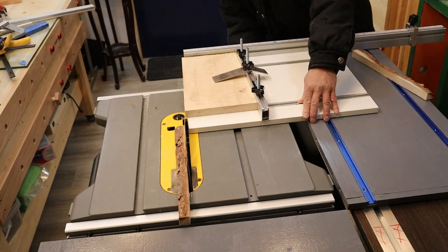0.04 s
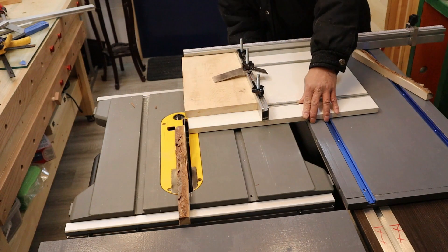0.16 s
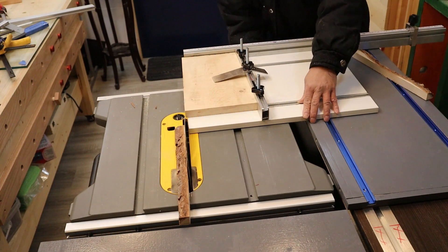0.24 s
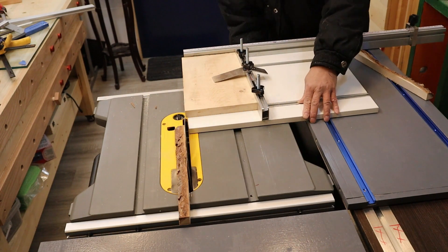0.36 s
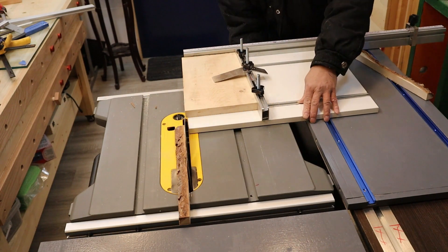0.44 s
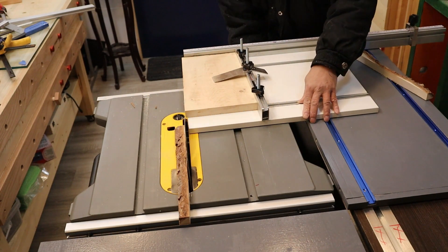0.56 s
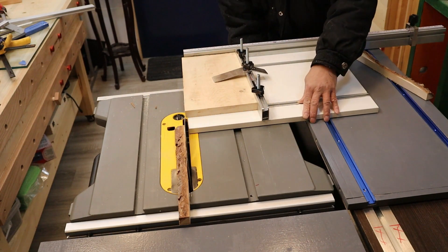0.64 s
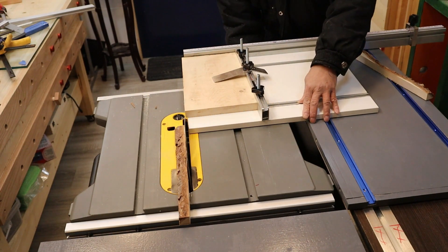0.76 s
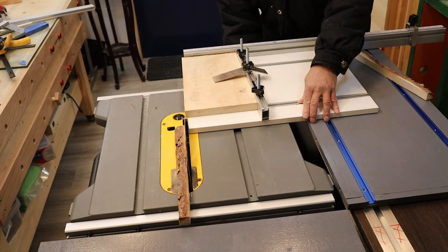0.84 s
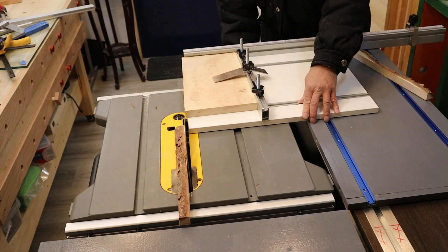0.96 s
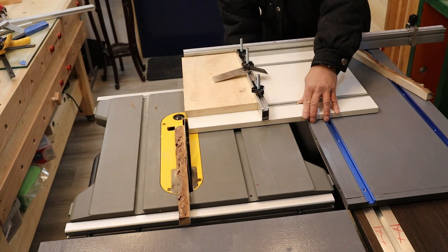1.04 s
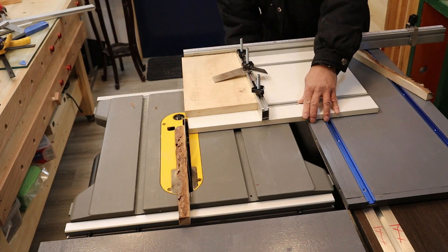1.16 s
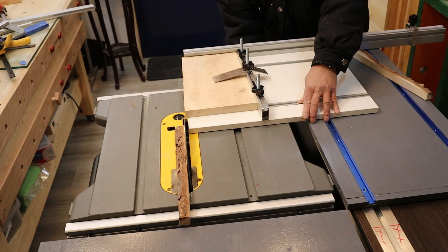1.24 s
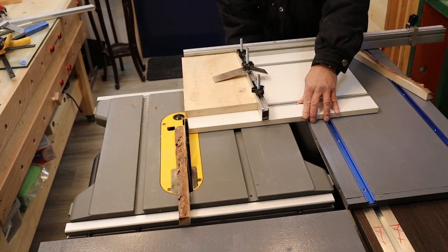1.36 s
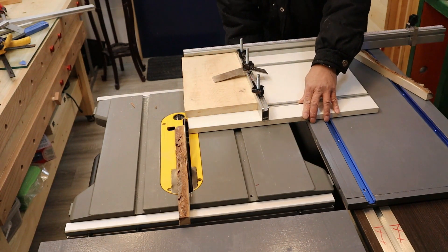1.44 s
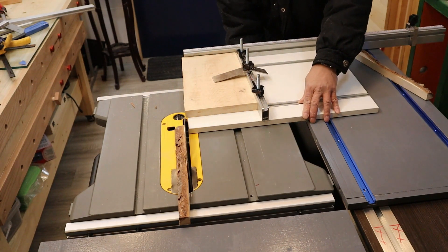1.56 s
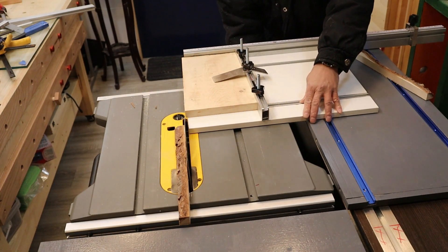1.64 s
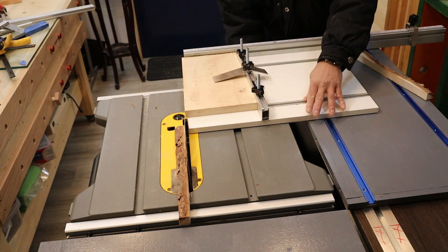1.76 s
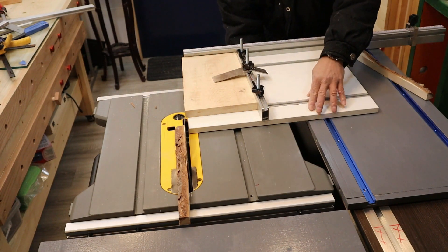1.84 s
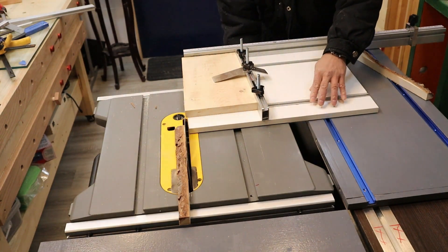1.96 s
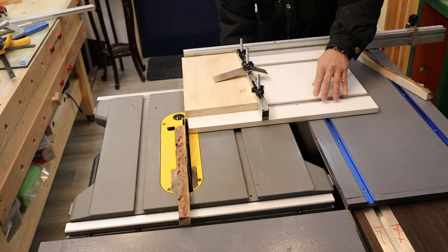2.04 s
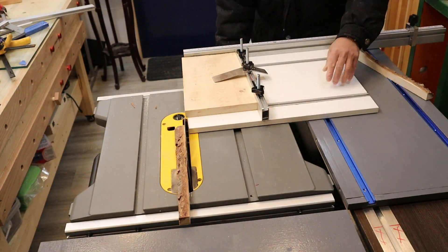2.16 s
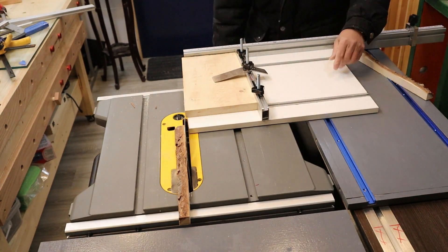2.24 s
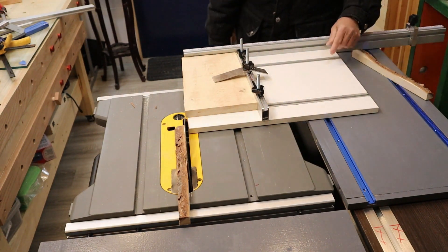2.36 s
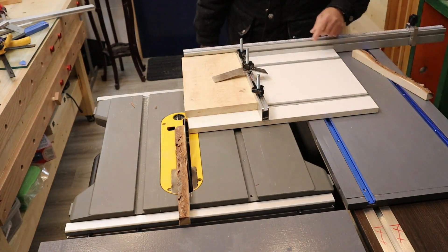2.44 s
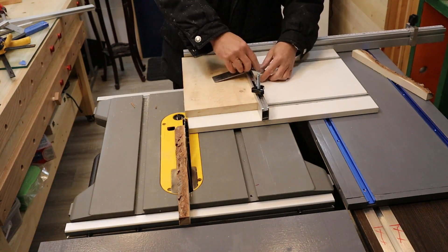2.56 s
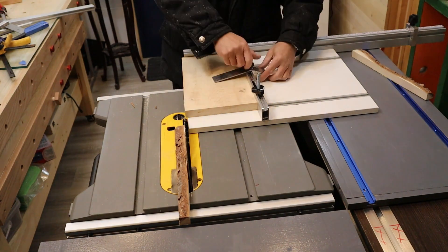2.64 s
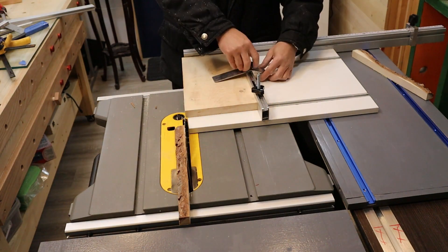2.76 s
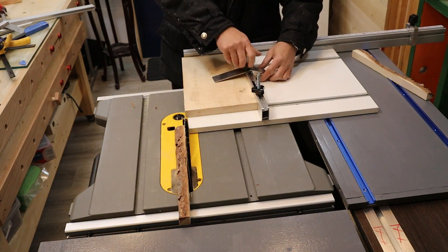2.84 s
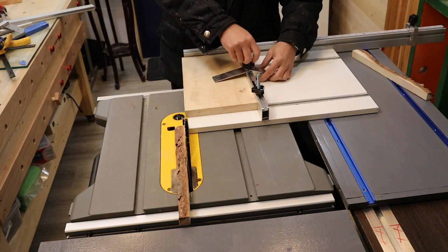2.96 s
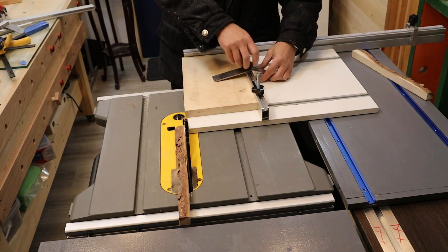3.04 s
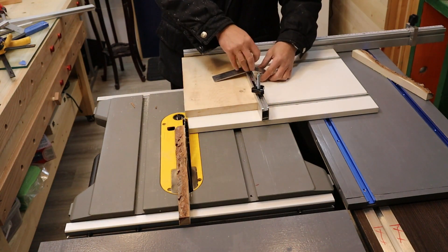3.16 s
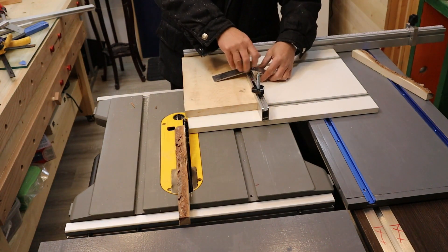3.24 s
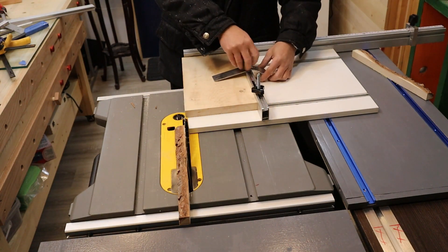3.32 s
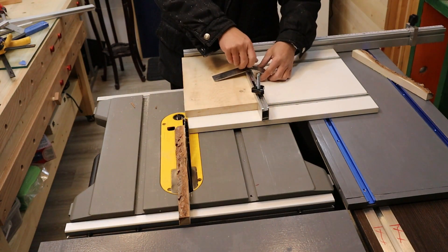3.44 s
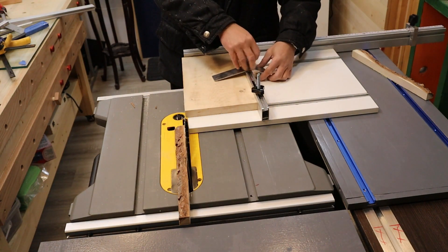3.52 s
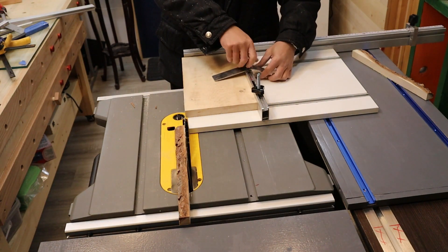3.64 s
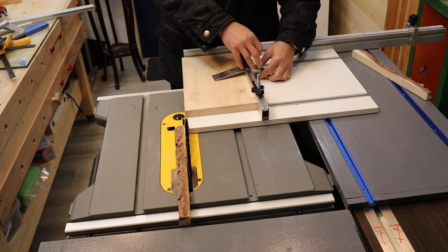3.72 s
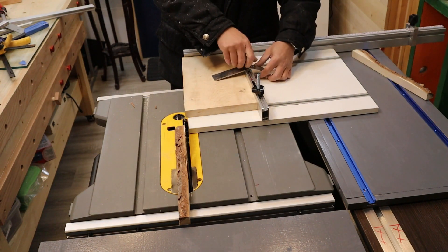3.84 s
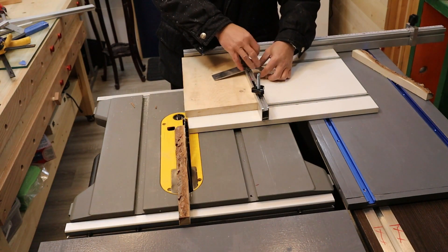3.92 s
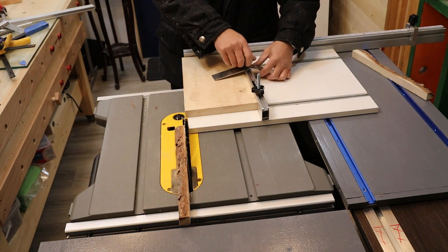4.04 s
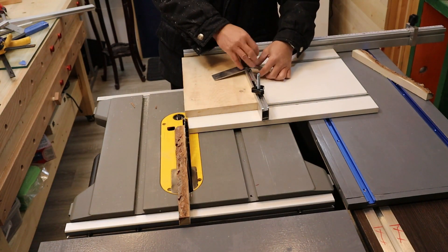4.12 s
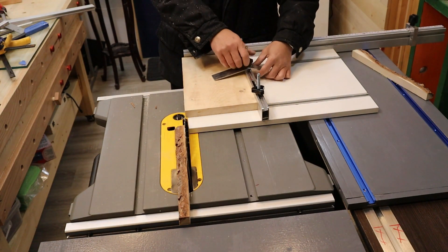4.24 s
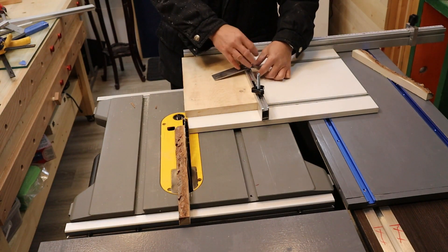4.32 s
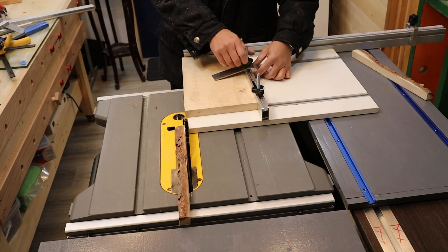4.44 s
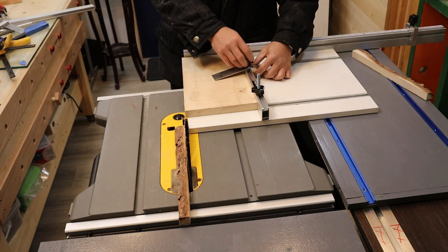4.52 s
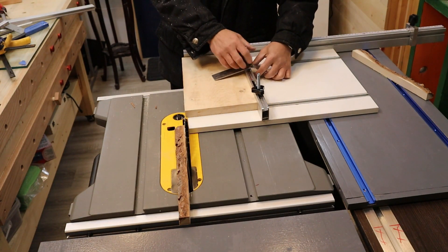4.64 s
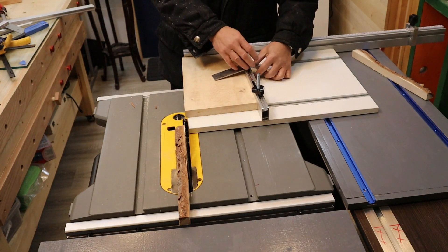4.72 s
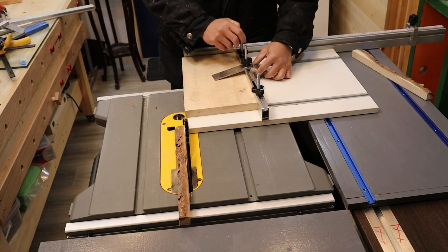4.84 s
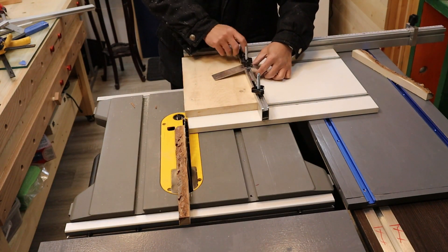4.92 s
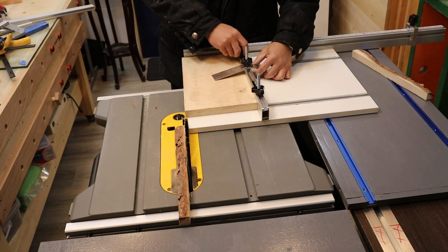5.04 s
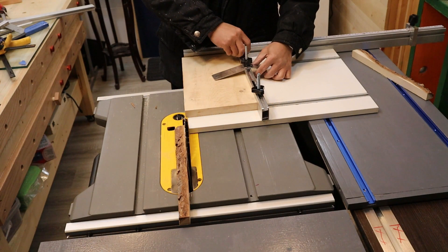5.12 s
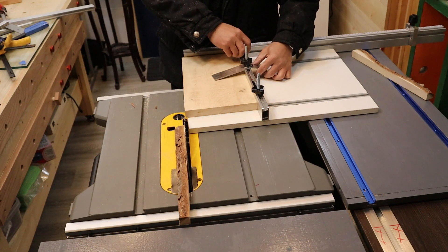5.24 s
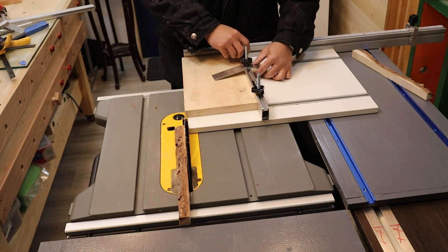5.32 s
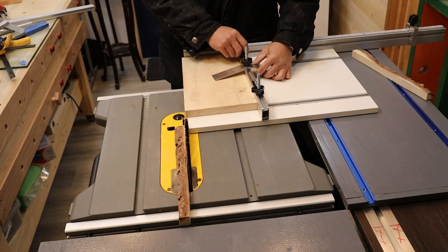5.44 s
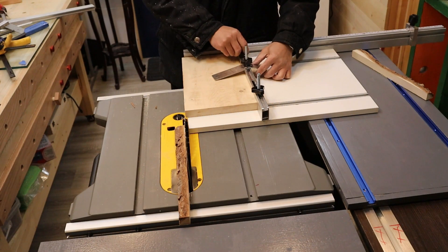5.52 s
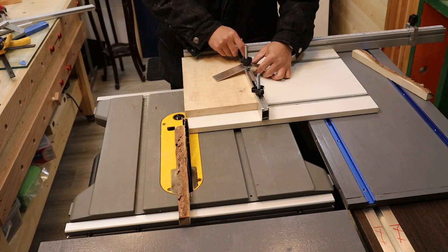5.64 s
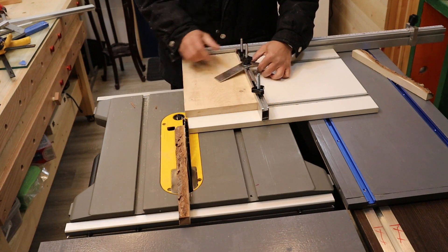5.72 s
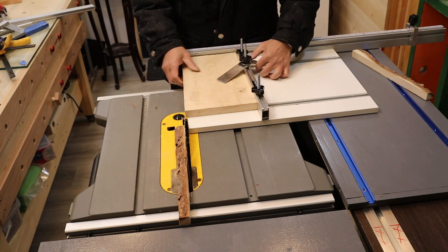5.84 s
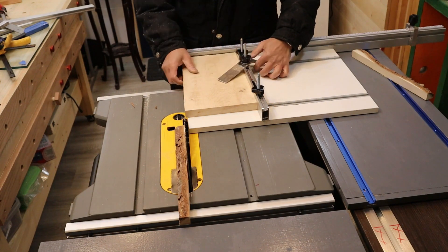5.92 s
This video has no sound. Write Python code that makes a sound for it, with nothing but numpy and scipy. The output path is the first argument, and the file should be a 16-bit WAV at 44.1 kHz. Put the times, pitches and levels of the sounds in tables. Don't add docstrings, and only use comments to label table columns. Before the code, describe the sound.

From 0 to 2 s, a dust extractor roars with broad, booming air and a thin, very high whistle, over a saw's steady, piercing gear whine. At about 2.0 s both are switched off: the whistle dies at once, the whine glides steeply down in fraying steps, a low hum swells briefly and sags, and air hisses as it coasts out. At about 2.55 s the sound cuts abruptly to a quiet workshop with faint low rumble and a drone swelling briefly near 2.9 s. Hands work a clamp on a wooden sled: irregular metallic clicks, dull board knocks, bright knob ticks and rustling rubs. They are busy and strongest from 3 to 4.8 s, mostly faint and sparse around 5 s, with light knocks near 5.2, 5.5 and 5.7-5.9 s and a closing rub. Sped-up playback smears each blow into a short, grainy swell. Wide stereo, close pickup, short small-room reflections.

```python
import sys
import numpy as np
from scipy import signal
from scipy.fft import rfft, irfft, next_fast_len
from scipy.io import wavfile
from scipy.ndimage import uniform_filter1d

SR = 44100
rng = np.random.default_rng(int(sys.argv[2]) if len(sys.argv) > 2 else 0)


def inscribe(sig):
    pcm = np.round(np.clip(np.atleast_2d(sig).T, -1, 1) * 32767)
    wavfile.write(sys.argv[1], SR, pcm.astype(np.int16))


def volts_from_db(level):
    exponent = np.asarray(level, float) / 20
    return 10 ** exponent


N = 263718
T = np.arange(N) / SR
RUN = 2 * int(1.3 * SR)
WIDE = 2 * next_fast_len(N // 2 + 1)
OFF_S, CHANGE_S = 2.015, 2.558
ALIKE, ALIKE_HZ, DRIFT_RAD, LEAD_RAD = 0.97, 403, 1.2, 1.2
# [f/Hz, density/dB per Hz]
CRACK = [(88, -79), (150, -41), (262, 18.5), (833, -15.5), (1640, -11.5), (1980, -17.5), (2140, -12),
         (6810, -16.5), (8750, -14), (10400, -10.5), (15000, -47)]


def level(x, db):
    return x * volts_from_db(db) / np.sqrt(np.mean(x ** 2))


def curves(table):
    s, *columns = np.transpose(table)
    return [np.interp(T, s, c) for c in columns]


def colour(points, size):
    hz, db = np.transpose(points)
    return volts_from_db(np.interp(np.log(np.fft.rfftfreq(size, 1 / SR) + 1), np.log(hz), db))


def peaks(table, size):
    f = np.fft.rfftfreq(size, 1 / SR)
    power = sum(volts_from_db(2 * db) / (1 + (2 * (f - hz) / width) ** 2) for hz, width, db in table)
    return np.sqrt(power)


def hiss(gain, count=N):
    size = 2 * (len(gain) - 1)
    noise = rfft(rng.standard_normal((2, size)))
    return level(irfft(noise * gain)[:, :count], 0)


def walk(rate, smooth=1.0, count=N):
    k = int(SR / rate)
    held = np.repeat(rng.standard_normal((2, N // k + 1)), k, axis=1)[:, :count]
    return 1.18 * uniform_filter1d(held, max(int(smooth * k), 1), axis=1)


def tone(hz, slip, flutter_db, count=N, lead=0):
    turn = 2 * np.pi * np.cumsum(hz + 0 * T[:count]) / SR + lead * np.array([[1], [0]])
    slips = slip * walk(2.2, 0.066, count=count)
    jitter = 0.22 * walk(60, count=count)
    return np.sqrt(2) * volts_from_db(flutter_db * walk(45, count=count)) * np.sin(turn + slips + jitter)


def room(x, t60=0.16, wet_db=-10):
    t = np.arange(SR // 2) / SR
    tail = rng.standard_normal((2, len(t))) * volts_from_db(-60 * t / t60) * (t > .006)
    wet = signal.fftconvolve(x, tail / np.linalg.norm(tail[0]), axes=1)[:, :x.shape[1]]
    return x + volts_from_db(wet_db) * wet


def extractor_whistle(since, shaft_hz):
    # [left/dB, right/dB, slip/rad]
    sidebands = [(-54, -67, 1.1), (-73, -56, 0.8), (-75, -64, 0.89), (-83, -57, 0.54), (-68, -68, 2),
                 (-50.5, -97, 2.55), (-45.5, -45.5, 0.14), (-74, -72, 1)]
    full_shaft_hz, blade_hz, t60_s = 266.9, 6651.9, 0.09
    whistle = 0
    for k, (left_db, right_db, slip) in enumerate(sidebands):
        line_hz = blade_hz + (k - 6) * full_shaft_hz
        fade = volts_from_db(np.array([[left_db], [right_db]]) - 60 * since / t60_s)
        whistle = whistle + fade * tone(line_hz, slip, 0.43, count=RUN)
    for from_hz, to_hz, slide_db in [(6610, 5600, -57.5), (3030, 2300, -63.5)]:
        slide_hz = to_hz + (from_hz - to_hz) * np.exp(-since / 0.11)
        sliding = tone(slide_hz, 3.0, 3.6, count=RUN) * (0.75 + 0.53 * walk(350, count=RUN))
        sliding = sliding * (.6 + 1.5 * np.cos(2 * np.pi * np.cumsum(shaft_hz) / SR))
        whistle = whistle + (since > 0) * volts_from_db(slide_db - 60 * since / 1.44) * sliding
    return whistle


def extractor_air(since):
    # [f/Hz, density/dB per Hz]
    running = [(15, -71), (25, -42.5), (196, -24.5), (264, -7.5), (309, -12), (1180, -8), (1310, -10),
               (3440, -7), (3930, -10), (4260, -10), (5570, -12.5), (6540, -15.5), (7090, -13),
               (10300, -14.5), (15000, -42.5)]
    # [f/Hz, density/dB per Hz]
    freewheeling = [(25, -53), (85, -14), (130, -24), (260, -11.5), (400, -18), (900, -11.5), (1600, -16),
                    (2300, -11.5), (3600, -16.5), (4600, -23), (5300, -11.5), (6000, -14.5), (7000, -15.5),
                    (9800, -26), (11500, -43), (15000, -66)]
    # [f/Hz, width/Hz, level/dB]
    housing = [(86, 10, 8), (355.6, 5.6, 7.5), (690, 75, 3), (800, 26, 1), (895, 28, 2), (1196, 25, 3.5),
               (2290, 125, -2.5), (2786, 27, -3), (3424, 130, -4.5)]
    roar_db, roar_lag_s, roar_t60_s = -44.5, 0.025, 0.49
    coast_db, coast_under_db, coast_lag_s, coast_t60_s = -55, -3, 0.16, 2.04
    run_db = roar_db - 60 * np.maximum(since - roar_lag_s, 0) / roar_t60_s
    coast_db = coast_db + coast_under_db * (since == 0)
    coast_db = coast_db - 60 * np.maximum(since - coast_lag_s, 0) / coast_t60_s
    air = hiss(colour(running, RUN), count=RUN)
    panels = hiss(colour(running, RUN) * peaks(housing, RUN), count=RUN)
    booming = volts_from_db(-7 + 3.0 * walk(14, count=RUN)) * panels
    driven = volts_from_db(run_db + 0.36 * walk(7, count=RUN)) * (air + booming)
    coasting = volts_from_db(coast_db + 1.8 * walk(12, count=RUN)) * hiss(colour(freewheeling, RUN), count=RUN)
    brake_colour = [(6000, -20), (7500, 1), (10300, 4), (11500, -17), (13000, -40)]
    brake = hiss(colour(brake_colour, RUN), count=RUN)
    brake_db = -49.5 - 60 * since / 1.05 + 2.5 * walk(30, count=RUN)
    return driven + coasting + np.clip(since / 0.026, 0, 1) * volts_from_db(brake_db) * brake


def extractor():
    # [t/s, f/Hz, level/dB]
    shaft = [
        (0, 268.6, -61.5),
        (2.04, 266, -67.5),
        (2.08, 255.4, -52),
        (2.13, 203.6, -58),
        (2.2, 190, -69),
        (2.26, 186.4, -87),
        (2.56, 181.2, -91),
    ]
    since = np.maximum(T[:RUN] - OFF_S, 0)
    hz, db = (c[:RUN] for c in curves(shaft))
    hum = volts_from_db(db) * tone(hz, 0.81, 2.5, count=RUN)
    return extractor_whistle(since, hz) + hum + extractor_air(since)


def saw():
    # [t/s, f/Hz, level/dB]
    gear = [(0, 4170, -54.5), (0.7, 4174.7, -56.5), (1.05, 4174.8, -54), (2.01, 4174.9, -54),
            (2.045, 3450, -55.5), (2.09, 2850, -56), (2.15, 2350, -59), (2.19, 2056, -57),
            (2.225, 1550, -67), (2.25, 1199, -66.5), (2.32, 1054, -64.5), (2.39, 771, -68.5),
            (2.48, 688, -69), (2.56, 553, -75)]
    # [left/dB, right/dB]
    orders = [(3.5, 0), (-9, -6), (-13, -12)]
    # [f/Hz, width/Hz, level/dB]
    frame = [(3450, 500, 2.5), (2200, 410, 10), (1090, 230, 5.5), (756, 120, 6.5)]
    hz, db = (c[:RUN] for c in curves(gear))
    slowing = T[:RUN] > OFF_S
    step = int(.045 * SR)
    stepped = np.roll(hz, -step // 2)[::step].repeat(step)[:RUN]
    hz = uniform_filter1d(stepped, step // 2) * slowing + hz * ~slowing
    lift = sum(lift_db / (1 + (2 * (hz - f) / width) ** 2) for f, width, lift_db in frame)
    db = db + slowing * (lift - 2.0)
    lead = 2.4 - 3.0 * (np.minimum(T[:RUN], OFF_S) - 1.25) ** 2
    mesh = 0
    for k, sides in zip((1, 2, 7 / 3), orders):
        gain = volts_from_db(np.array(sides)[:, None] - 15 * slowing * (k > 1))
        mesh = mesh + gain * tone(k * hz, 0.15, 1.9, count=RUN, lead=lead)
    fray = slowing * 1.7 * np.clip(hz / 2500, .45, 1) * walk(400, count=RUN)
    swell = volts_from_db(db - 2.5 + 2.1 * walk(25, count=RUN) * slowing)
    return room(swell * mesh * (1 + fray), 0.19, -6.5)


def rubbing():
    # [t/s, level/dB]
    grip = [(2.56, -74), (2.81, -80.5), (3.07, -72), (3.2, -62.5), (3.4, -66.5), (3.76, -62.5), (3.86, -75),
            (4.0, -60), (4.1, -76), (4.41, -64.5), (4.55, -70.5), (4.71, -68.5), (5.24, -73.5), (5.48, -80),
            (5.87, -72), (5.98, -59.5)]
    low_db = curves(grip)[0]
    steel_db = low_db.mean() - 18.5 + 1.6 * (low_db - low_db.mean())
    humming = peaks([(3100, 90, 4), (1070, 60, 0.0), (2150, 80, 0.0), (1710, 120, 0.0)], WIDE)
    wood_band = colour([(300, -26.0), (700, -0.5), (6000, -17.5), (7000, -36)], WIDE)
    wood = hiss(np.hypot(volts_from_db(10) * colour(CRACK, WIDE), humming) * wood_band)
    thread = peaks([(7380, 60, -4), (8570, 260, 1), (10080, 60, -11)], WIDE)
    steel_band = colour([(5000, -25), (6000, -4), (11000, -5), (13000, -25)], WIDE)
    steel = hiss(np.hypot(volts_from_db(-16) * colour(CRACK, WIDE), thread) * steel_band)
    return volts_from_db(low_db + 4.7 * walk(40)) * wood + volts_from_db(steel_db + 2.0 * walk(40)) * steel


def shop():
    # [f/Hz, density/dB per Hz]
    quiet = [(12, -34), (20, 2), (66, 0.5), (135, -9), (199, -5.5), (457, -11), (555, -17.5), (889, -11),
             (994, -15.5), (3180, -30), (11700, -40.5), (12700, -39), (15000, -56)]
    # [t/s, level/dB]
    floor = [(2.58, -75), (2.72, -71), (2.77, -85), (2.85, -68), (3.17, -88), (3.44, -86), (3.54, -71),
             (3.58, -82), (4.32, -70.5), (4.59, -89), (4.63, -72), (5.3, -72), (5.33, -91), (5.43, -70),
             (5.96, -75), (5.98, -80)]
    # [t/s, level/dB]
    passing = [
        (2.56, -65),
        (2.7, -63),
        (2.86, -57),
        (3.05, -66),
        (3.12, -74),
        (3.4, -72.5),
        (3.5, -87),
        (5.98, -90),
    ]
    rumble = hiss(colour([(12, -18), (25, -2), (55, 3.0), (95, -5), (120, -27), (200, -60)], WIDE))
    heave = volts_from_db(curves(floor)[0] + 4.5 + walk(7.1)[0])
    air = hiss(colour(quiet, WIDE) * colour([(60, -22), (110, 2.5), (200, -1.0)], WIDE))
    air = volts_from_db(-68.5 + 1.0 + 1.5 * walk(9.6)) * air
    drone = volts_from_db(curves(passing)[0]) * tone(77 + 1.52 * walk(2.4)[0], 0.1, 1.5)
    lamp = volts_from_db(-93) * tone(12350, 0.15, .3)
    return air + heave * rumble + drone + lamp


def ring(modes, scatter, t, spread_db):
    hz, db, t60 = np.transpose(modes)[:, :, None]
    hz = hz * (1 + 0.0046 * scatter[1][:, None])
    decay = volts_from_db(db + spread_db * scatter[0][:, None] - 85 * t / t60)
    return np.sum(decay * np.sin(2 * np.pi * hz * t), axis=0)


def blows():
    # [f/Hz, level/dB, time to fall 85 dB/s]
    board = [(224, -9, 0.12), (264, -2, 0.093), (311, -2.5, 0.071), (379, -3, 0.065), (461, -1, 0.07),
             (507, -5, 0.06), (674, -12, 0.058)]
    bar = [(1071, -6, 0.2), (1309, -4, 0.16), (1574, -5.5, 0.028), (1701, -0.5, 0.087), (1858, -2, 0.076),
           (2150, 2.5, 0.067), (2680, -9, 0.2), (3100, -16, 0.13), (3240, -3, 0.08), (3630, -3.5, 0.083),
           (4300, -24, 0.17), (4630, -10, 0.071), (5150, -14, 0.1)]
    knob = [(6070, -15, 0.079), (6520, -14, 0.09), (7400, -14, 0.059), (8300, -22, 0.045),
            (8700, -10, 0.087), (9100, -27, .08), (8810, 8.5, 0.05), (8950, 0, 0.052), (9100, -3, 0.06),
            (10100, -2, 0.058), (10860, -14, 0.055), (11800, -21, 0.055)]
    # [t/s, bar level/dB, board over bar/dB, knob over bar/dB]
    at_foot = [(2.668, -53.5, -6.5, 4), (2.849, -57, -2.5, -19), (3.421, -41, -19, -9.5),
               (3.567, -55.5, -6, -12), (4.137, -42.5, -7.5, -13), (4.268, -62, -9, -29),
               (4.378, -46, -23, -25), (4.584, -53, -4, -25), (4.629, -55, -0.5, -33),
               (4.744, -39.5, -6.5, -11), (4.801, -54, -8, -5.5), (4.829, -55, -15, -27),
               (4.925, -62, -1, -13), (5.307, -61, -0.5, -19), (5.713, -61, -2, -17), (5.799, -61, -5, -20)]
    at_slot = [(3.262, -52, -16, -9), (3.309, -54, -13, -17), (3.353, -44.5, -6, -19),
               (3.651, -43, -12.5, -11), (3.79, -48.5, -3.5, -7.5), (3.968, -38, -25, -11.5),
               (4.352, -36.5, -13, -14), (4.234, -40.5, -9.5, -10.5), (4.403, -52, -29, -11),
               (4.539, -45, -9.5, 2.5), (4.551, -39, -10, -13), (4.862, -55.5, -3.5, -23),
               (5.177, -47, -1, -26), (5.471, -57, -1, -35), (5.764, -46, -9, -17), (5.93, -53, -7.5, -20)]
    at_arm = [(2.569, -51, -19, -32), (2.746, -42, -11.5, -12.5), (2.813, -43, -17, -28),
              (3.016, -36.5, -16, -9), (3.045, -37, -2.5, -17), (3.091, -34, -11.5, -15),
              (3.134, -56, -12, -6), (3.171, -43.5, 0.5, -23), (3.221, -46, -12, -14),
              (3.371, -46.5, -3, -32), (3.759, -40.5, -12, -28), (3.828, -40.5, -8, -18.5),
              (3.853, -62, 2, -24), (4.003, -36.5, -16.5, -11.5), (5.023, -61, -11, -21)]
    at_screw = [(3.439, -47, -10, -16), (3.525, -45, -20, -4), (3.6, -52, -11, -10), (3.724, -44.5, -13, 0),
                (3.914, -45, -13.5, 0.5), (4.039, -42.5, -16, -14), (4.188, -45, -7, -12.5),
                (4.337, -43, -16, -1.5), (4.439, -52, -26, -3.5), (4.958, -61.5, -22, -25),
                (5.673, -66, -8, -10.5), (5.89, -58, -11, -16)]
    # (blows, brightest Hz, swell ms of a middling blow)
    spots = [(at_foot, 1280, 11), (at_slot, 1790, 10.9), (at_arm, 2210, 9), (at_screw, 3250, 10.4)]
    middling_db, lead = -46, 1300
    size, out = 6400, np.zeros((2, N + 6400))
    t, f = np.arange(size) / SR, np.fft.rfftfreq(size, 1 / SR)
    share = np.clip(ALIKE / np.hypot(1, f / ALIKE_HZ), 0, 1)
    no_bass = 1 / (1 + (190 / (f + 1)) ** 8)
    low, below_top = 1 / (1 + (f / 700) ** 4), 1 / (1 + (f / 6800) ** 6)
    bands = low * no_bass, below_top - low * below_top, 1 - below_top
    cracks = [colour(CRACK, size) * band for band in bands]
    strokes = sorted(row + spot[1:] for spot in spots for row in spot[0])
    for s, bar_db, board_db, knob_db, bright_hz, swell_ms in strokes:
        force_db = bar_db - middling_db
        swell = np.clip(swell_ms + 0.21 * force_db, 3, 30) / 1000
        since = (t - lead / SR) / swell - .32
        push = np.where(since < 0, np.exp(-1.25 * since ** 2), np.exp(-.75 * np.abs(since) ** 1.26))
        push = push + 0.37 * np.exp(-(since / 0.13) ** 2)
        tilt = np.hypot(1, volts_from_db(5.0) / (1 + ((f - bright_hz) / 350) ** 2))
        tilt = tilt / (1 + (f / 14000) ** 8) * no_bass
        dull_hz = 13000 * volts_from_db(.3 * (knob_db + 10 + force_db))
        tilt = tilt / np.hypot(1, (f / dull_hz) ** 2)
        start = int(s * SR) - lead
        edge_db = .3 * force_db
        knob_crack_db = -2.5 + edge_db - 0.39 * (knob_db + 8.5)
        parts = [(board, cracks[0], board_db + 6.0, -5.0, 1.05, 130),
                 (bar, cracks[1], -.6, 4.5 + edge_db, 1.05, 30),
                 (knob, cracks[2], knob_db + 5.0, knob_crack_db, .95, 0)]
        for modes, crack, db, crack_db, slow, late in parts:
            clumps = volts_from_db(2.9 * rng.standard_normal((2, size // 32))).repeat(32, axis=1)
            grit = rng.standard_normal((2, size)) * clumps
            body = rfft(ring(modes, rng.standard_normal((2, len(modes))), t[:size // 2], 3.5), size)
            gain = body / np.linalg.norm(body) + volts_from_db(crack_db) * crack / np.linalg.norm(crack)
            shove = rfft(grit * np.roll(push, late) ** (1 / slow))
            shared = share * shove[0] * np.exp(1j * (LEAD_RAD + DRIFT_RAD * grit[1, 0]))
            shove[1] = shared + np.sqrt(1 - share ** 2) * shove[1]
            sound = irfft(shove * gain * tilt)
            loudest = np.sqrt(uniform_filter1d(np.mean(sound ** 2, axis=0), 400).max())
            out[:, start:start + size] += sound * volts_from_db(bar_db + db - 5.0) / loudest
    return out[:, :N]


def singing():
    # [t/s, f/Hz, level/dB,
    # length/s]
    sung_modes = [(2.665, 5250, -68, 0.058), (3.096, 2150, -54, 0.031), (3.098, 7300, -55, 0.048),
                  (3.251, 8760, -60, 0.042), (3.282, 5170, -75.5, 0.06), (3.342, 7400, -67, 0.059),
                  (3.43, 3180, -64, 0.09), (3.604, 5120, -67, 0.15), (3.722, 10077, -57, .06),
                  (3.795, 10050, -60, .05), (3.998, 7400, -57, 0.069), (4.032, 3100, -56, 0.055),
                  (4.199, 3100, -56.5, 0.1), (4.434, 3187, -61, 0.049), (4.75, 1484, -45.5, .03),
                  (5.67, 3100, -76, 0.14), (5.889, 3100, -62.5, 0.095),
                  (3.007, 4650, -51, .025), (3.007, 6100, -52, .025), (3.007, 6600, -54, .025),
             (3.007, 10300, -55, .025), (3.04, 2640, -50, 0.033), (3.043, 291, -50, .03),
             (3.088, 3210, -50, 0.04), (3.168, 320, -49, .04), (3.198, 300, -55, .03),
             (3.217, 6400, -60, .025), (3.344, 1067, -55, 0.032), (3.349, 10100, -66, .04),
             (3.362, 2200, -56, 0.027), (3.523, 9340, -59, .03), (3.645, 3250, -60, .03),
             (3.75, 6550, -65, .025), (3.765, 300, -52, .05), (3.805, 8750, -59, 0.054),
             (3.907, 8200, -51, 0.029), (3.908, 10077, -55, .035), (3.942, 344, -58, .035),
             (3.965, 6200, -60, .025), (4.03, 10077, -60, .035), (4.14, 240, -53, .035),
             (4.235, 8750, -60, .04), (4.505, 3180, -66, .03), (4.725, 8700, -64, .03),
             (4.955, 5100, -74, .03), (4.955, 3300, -70, .035), (4.18, 1851, -57, .03),
             (4.188, 8500, -62, .03), (4.332, 9991, -49, .04), (4.40, 8770, -62, 0.085),
             (4.53, 9388, -60, .025), (4.796, 8742, -57, .04), (5.17, 2090, -60, 0.033),
             (5.174, 1707, -60, .03), (5.68, 287, -61, .06), (5.755, 1855, -59, .035),
             (5.756, 4640, -63, .035), (5.755, 3900, -64, .03), (5.755, 6400, -66, .022),
             (5.75, 5700, -66, .025), (5.755, 299, -59, 0.065), (5.66, 10000, -76, .03),
             (5.9, 8700, -73, .06)]
    out = np.zeros((2, N + SR))
    for s, hz, db, length in sung_modes:
        t = np.arange(int(1.6 * length * SR)) / SR
        shape = np.sin(np.minimum(t / 0.014, 1) * np.pi / 2) ** 2 * np.exp(-(t / length) ** 3 * 2.9)
        drift = np.cumsum(rng.standard_normal((2, SR // 4)), axis=1)[:, :len(t)]
        phase = 2 * np.pi * hz * t + 0.065 * drift + np.array([[0], [1.5]])
        start = int((s - .002) * SR)
        out[:, start:start + len(t)] += volts_from_db(db + 3.5) * shape * np.sin(phase)
    return out[:, :N]


def streaks(x, depth_db=3.0, hold=7):
    spec = signal.stft(x, nperseg=2048, noverlap=1536)[2]
    f = np.fft.rfftfreq(2048, 1 / SR)[:, None]
    luck = uniform_filter1d(rng.standard_normal(spec.shape), hold, axis=2) * np.sqrt(hold)
    noisy = np.abs(spec) < 4 * uniform_filter1d(np.abs(spec), 15, axis=1)
    gain = volts_from_db(depth_db * luck * noisy - 0.1 * depth_db ** 2 * noisy)
    share = np.clip(ALIKE / np.hypot(1, f / ALIKE_HZ), 0, 1) * (noisy[1] | (f < ALIKE_HZ))
    wander = uniform_filter1d(luck[0], 40, axis=1, mode="wrap")
    shared = share * spec[0] * np.exp(1j * (LEAD_RAD + DRIFT_RAD * wander / wander.std()))
    spec[1] = shared + np.sqrt(1 - share ** 2) * spec[1]
    spec[1] *= 1 + 0.31 * share ** 2
    gain[1] = gain[0] ** share * gain[1] ** (1 - share)
    return signal.istft(spec * gain, nperseg=2048, noverlap=1536)[1][:, :N]


def scene():
    after = np.clip((T - CHANGE_S) / 0.0098 + .5, 0, 1)
    machines = np.pad(extractor() + saw(), ((0, 0), (0, N - RUN)))
    beds = streaks((1 - after) * machines + after * (rubbing() + shop()))
    return beds + room(blows() + singing())


def low_pass(x):
    return signal.sosfilt(signal.butter(12, 15200, fs=SR, output="sos"), x)


def record(dry):
    return low_pass(dry)


dry = scene()
out = record(dry)
inscribe(out)
```